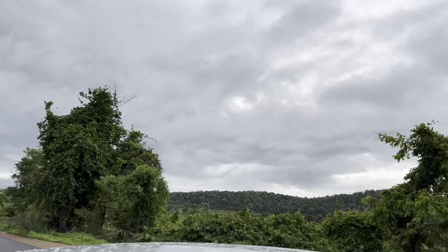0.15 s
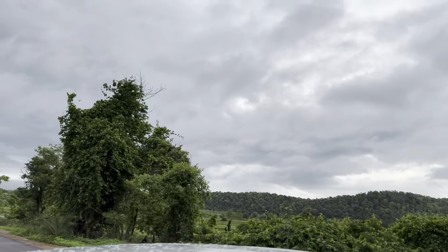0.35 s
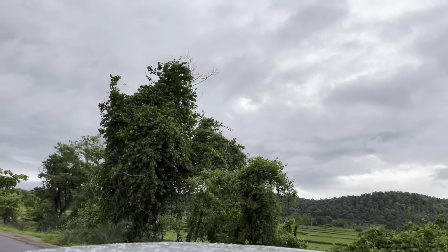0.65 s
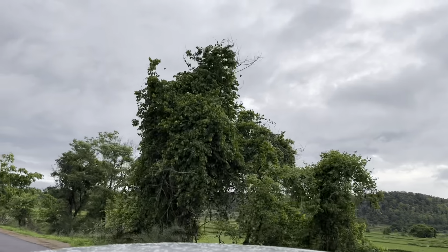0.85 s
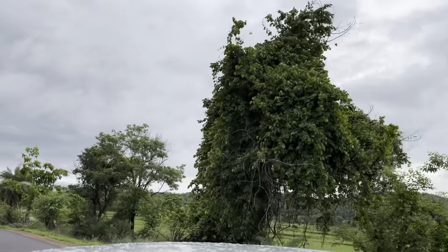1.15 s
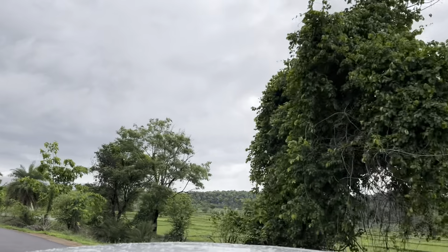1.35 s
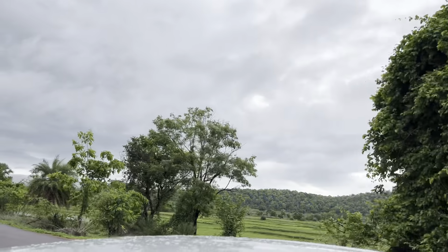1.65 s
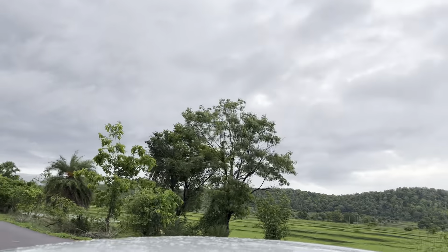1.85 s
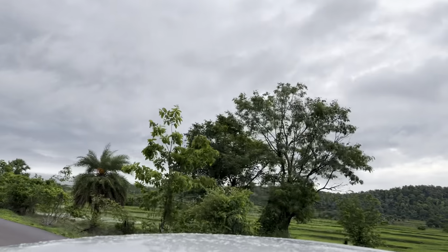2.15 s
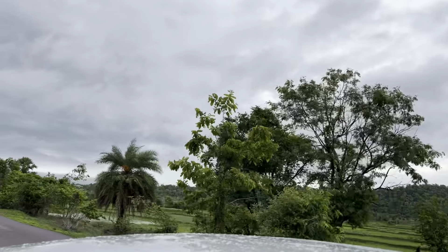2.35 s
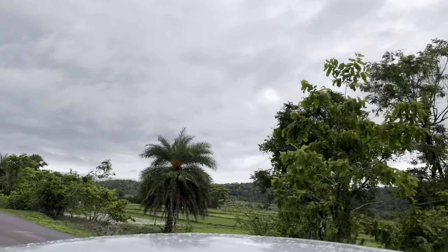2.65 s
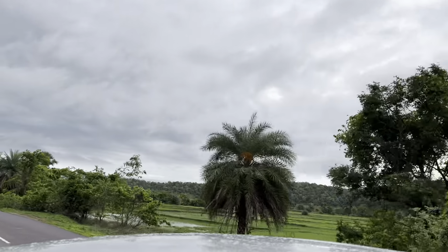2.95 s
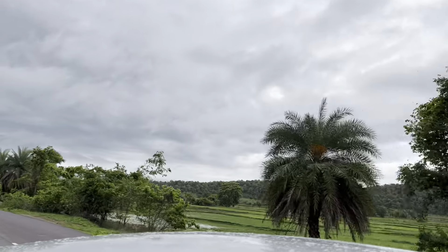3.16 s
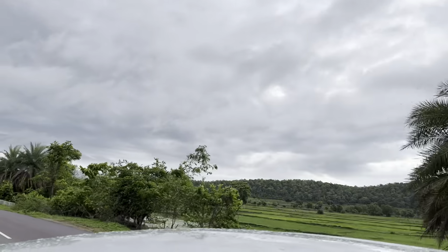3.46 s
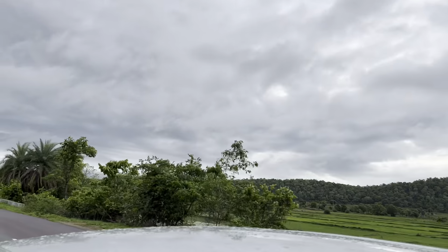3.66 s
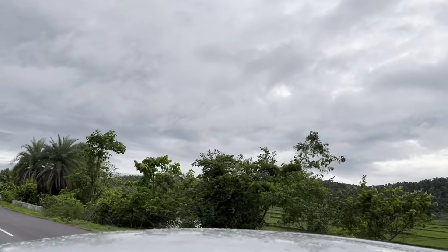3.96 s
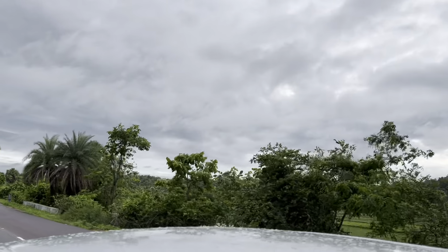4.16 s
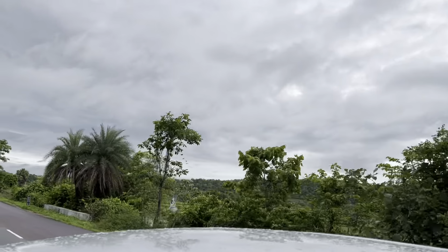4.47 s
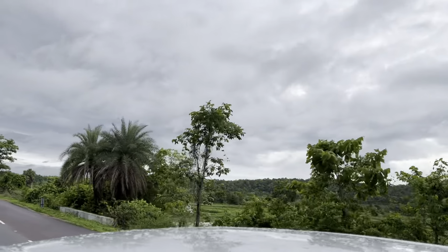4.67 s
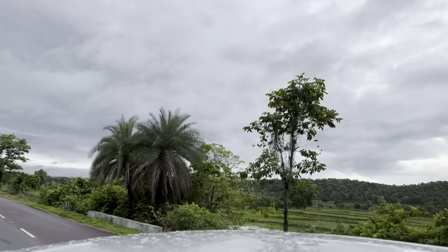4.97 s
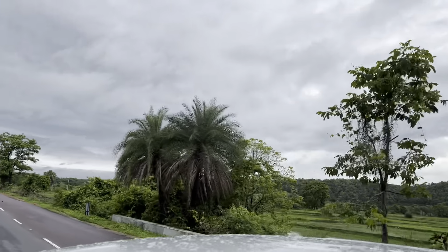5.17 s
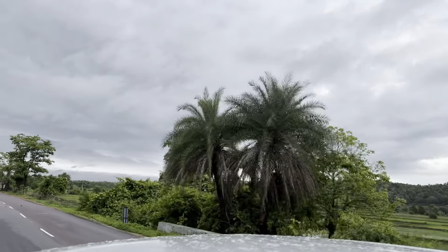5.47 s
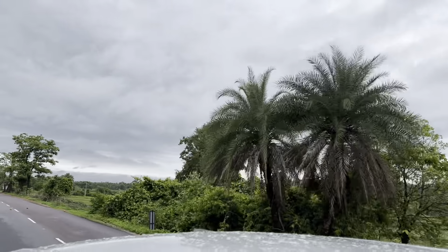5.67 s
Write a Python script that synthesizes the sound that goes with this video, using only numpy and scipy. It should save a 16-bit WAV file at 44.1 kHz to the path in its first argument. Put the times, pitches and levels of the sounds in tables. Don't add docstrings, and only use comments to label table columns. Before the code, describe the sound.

Wind buffets a phone held out of a moving car window: steady rushing hiss, low rumble, and irregular hard thumping pops and crackles.

```python
import sys
import numpy as np
from scipy import signal
from scipy.fft import rfft, irfft, next_fast_len
from scipy.io import wavfile
from scipy.ndimage import uniform_filter1d

SR = 44100
rng = np.random.default_rng(int(sys.argv[2]) if len(sys.argv) > 2 else 0)


def int16_out(signal):
    q = np.round(np.clip(np.atleast_2d(signal).T, -1, 1) * 32767)
    wavfile.write(sys.argv[1], SR, q.astype(np.int16))


def how_loud(loudness_db):
    steps = np.asarray(loudness_db, float) / 20
    return 10 ** steps


N = 256662
T_S = np.arange(N) / SR
SIZE = next_fast_len(N + SR // 4)
HZ = np.maximum(np.arange(SIZE // 2 + 1) * SR / SIZE, 1)

# (frequency [Hz], density [dB per Hz])
RUSH_SPECTRUM = [(150, -12.5), (400, -1.5), (700, 1), (1100, -2), (1650, -6), (1900, -15.5), (3000, -30),
                 (6000, -66.5), (15000, -109)]
# (time [s], pressure [dB], width [ms], push 1 or pull -1)
POP_EDDIES = [(0.0343, -11, 1.2, 1), (0.106, -4.5, 1.3, -1), (0.133, 6, 5.2, 1), (0.2655, -5.5, 2.6, 1),
              (0.3225, -4.5, 1.15, 1), (0.685, -12, 0.43, -1), (0.8184, -13, 1.3, -1),
              (1.1472, -3, 2.3, -1), (1.2593, 8.5, 0.68, 1), (1.2715, -5, 0.56, 1), (1.2844, 1.5, 3.1, -1),
              (1.426, -5.5, 0.92, -1), (1.6614, 7, 1.53, 1), (1.8024, 6.5, 1.1, 1), (2.269, 6, 7, -1),
              (2.307, 0, 4.1, 1), (2.362, -3, 3.4, 1), (3.5636, -3, 0.76, -1), (3.9147, -4, 2.3, -1),
              (4.28, -7, 0.92, 1), (4.848, -6.5, 1.4, -1), (4.8752, 6, 1.08, 1), (5.065, -5.5, 1.5, -1),
              (5.307, 0, 2, 1), (5.3643, -2, 0.88, 1), (5.4403, 0.5, 0.9, -1), (5.472, -2.5, 0.77, -1),
              (5.503, -3.5, 0.53, -1), (5.5377, -3.5, 1.6, -1), (5.7552, 1, 0.54, -1)]


def rms_one(x):
    return x / np.sqrt(np.mean(x ** 2) + 1e-20)


def at_hz(points, column=1):
    points = np.array(points)
    return np.interp(np.log(HZ), np.log(points[:, 0]), points[:, column])


def coloured(x, spectrum):
    return irfft(rfft(x, SIZE) * rms_one(how_loud(at_hz(spectrum))), SIZE)[..., :N]


def drift(rate_hz):
    hop = 40
    r = np.exp(-2 * np.pi * rate_hz * hop / SR)
    slow = signal.lfilter([1], [1, -2 * r, r * r], rng.standard_normal(N // hop + 2002))
    slow = slow[2000:]
    slow = slow - uniform_filter1d(slow, size=200)
    return np.interp(np.arange(N) / hop, np.arange(len(slow)), rms_one(slow))


def turbulence(spectrum, gust_db, patchy_db, rate_hz, channels=2):
    white = rfft(rng.standard_normal((channels, N)), SIZE) * how_loud(at_hz(spectrum))
    gust = gust_db * drift(rate_hz)
    out = 0
    for octave in np.arange(5, 15):
        band = np.cos(np.pi / 2 * np.clip(np.log2(HZ) - octave, -1, 1)) ** 2
        flicker = patchy_db * drift(rate_hz * 1.4)
        out = out + irfft(white * band, SIZE)[:, :N] * how_loud(gust + flicker)
    return rms_one(out)


def swells(rows):
    return sum(height * np.exp(-.5 * ((T_S - s) / length_s) ** 2) for s, height, length_s in rows)


def bumps(eddies):
    out = np.zeros((2, N))
    for s, level_db, width_ms, way, pan_db in eddies:
        near = slice(max(round((s - .02) * SR), 0), round((s + 0.036) * SR))
        lean = np.tanh(pan_db / 7) * np.array([[1], [-1]])
        bell = np.exp(-.5 * ((T_S[near] - s) / width_ms * 1000) ** 2)
        out[:, near] += way * how_loud(level_db) * (1 + lean) * bell
    return out


def airstream():
    # (time [s], speed as rush level [dB], broadside buffeting [dB])
    air = [(0.0, -28, -19.5), (0.41, -29, -31.5), (0.74, -27, -18.5), (0.92, -30, -25), (1.28, -29, -21.5),
           (1.46, -29, -27), (1.77, -28, -26.5), (2.06, -28, -26), (2.17, -30, -26.5), (2.66, -29.5, -27),
           (3.37, -31, -32), (3.71, -30.5, -28.5), (4.02, -28, -26.5), (4.28, -31.5, -27),
           (4.78, -30, -28.5), (5.07, -27, -23), (5.45, -28, -29), (5.82, -29, -20.5)]
    # (time [s], swell [dB], length [s], whistle [dB])
    gusts = [(0.036, -1, 0.029, -2.5), (.21, 0.5, 0.075, -1), (0.536, -1, 0.062, -1.5), (.7, 2.5, 0.057, 2),
             (0.805, -1.5, 0.048, -1.5), (0.967, 1.5, .03, 1.5), (1.289, 9, 0.045, 5.5),
             (1.81, 3, 0.05, 1.5), (2.309, 5, .05, 2.5), (2.606, 2, 0.074, 1), (3.163, 1.5, 0.026, 0),
             (3.3, -1, 0.075, 0.5), (3.9, 2.5, 0.059, 0), (4.042, 2, 0.04, -3), (4.284, 4.5, 0.016, 1),
             (4.452, 0, 0.083, 3), (4.65, -1.5, 0.069, 0), (5.103, -2, 0.04, 2), (5.3, 2, 0.065, 2),
             (5.492, 0, 0.036, 2), (5.64, 0.5, .04, 2), (5.815, 0.5, 0.025, 1.5)]
    s, speed_db, broadside_db = np.transpose(air)
    gust_db = swells([(s, db, length_s) for s, db, length_s, _ in gusts])
    whistle_db = swells([(s, db, length_s) for s, _, length_s, db in gusts])
    return np.interp(T_S, s, speed_db), np.interp(T_S, s, broadside_db), gust_db, whistle_db


def hiss(swing_db, whistle_db):
    # (frequency [Hz], density [dB per Hz])
    hiss_spectrum = [(900, -6), (1900, -4.5), (2500, -3), (3500, -6.5), (5000, -13), (6000, -15),
                     (6700, -17), (8000, -20), (9200, -25.5), (10800, -25), (12500, -30.5), (14500, -35.1),
                     (15500, -39)]
    # (frequency [Hz], likeness [0-1], right leads by [rad], left-right [dB])
    body = [(1900, .85, 0, 0), (2600, .4, -.6, 2), (3600, .15, -2.0, 4), (5100, .35, 0, 6),
            (6700, .6, 3.14, 1), (8000, .75, 5.4, -1), (9300, .95, 6.3, 0), (10400, .7, 7.3, 0),
            (11700, .65, 9.0, 0), (12700, .95, 9.4, 0), (13900, .5, 10.3, 0), (15100, .5, 12.5, 0)]
    mean_db, follows, fade_db_s = -38, 0.96, 0.93
    one, other = rfft(turbulence(hiss_spectrum, gust_db=1.03, patchy_db=1.43, rate_hz=100), SIZE)
    alike, lead_rad, tilt = at_hz(body), at_hz(body, column=2), how_loud(at_hz(body, column=3) / 2)
    right = alike * one * np.exp(1j * lead_rad) + np.sqrt(1 - alike ** 2) * other
    ports = irfft(np.array([one * tilt, right / tilt]), SIZE)[:, :N]
    return how_loud(mean_db + follows * swing_db + whistle_db - fade_db_s * T_S) * ports


def buffet(broadside_db, gust_db):
    # (frequency [Hz], density [dB per Hz])
    buffet_spectrum = [(20, -17), (45, 3.5), (90, -3.5), (150, -8.5), (250, -15.5), (600, -37), (1200, -49),
                       (6000, -110)]
    level = how_loud(broadside_db + 4 + 0.13 * gust_db)
    return level * turbulence(buffet_spectrum, gust_db=1.1, patchy_db=0.2, rate_hz=65, channels=1)


def flutter(swing_db, gust_db):
    # (frequency [Hz], density [dB per Hz])
    flutter_spectrum = [(60, -67.5), (130, -15.5), (220, 3.5), (330, 3), (520, -1), (900, -7),
                        (3000, -97.5)]
    shake_db, shake_s, shake_width_ms = -40, .012, 1
    shaken = swells([(s, how_loud(db + shake_db) * np.exp(-width_ms / shake_width_ms), shake_s)
                     for s, db, width_ms, _ in POP_EDDIES])
    level = how_loud(-31 + 0.23 * (swing_db + gust_db)) + shaken
    return level * turbulence(flutter_spectrum, gust_db=1.5, patchy_db=3.1, rate_hz=44, channels=1)


def rush(rush_db):
    return how_loud(rush_db) * turbulence(RUSH_SPECTRUM, gust_db=0.26, patchy_db=2.36, rate_hz=17)


def swarm(rush_db, per_s=110.0, width_ms=0.2):
    density = per_s * how_loud(rush_db - np.mean(rush_db))
    born = rng.random((2, N)) < density / SR
    sizes = how_loud(6.14 * np.minimum(rng.exponential(1, (2, N)), 3))
    sizes = sizes * rng.choice([-1, 1], (2, N))
    bump = np.exp(-.5 * (np.arange(-60, 61) / SR / width_ms * 1000) ** 2)
    return signal.fftconvolve(born * sizes * how_loud(rush_db + 2.25), bump[None], "same")


def crackles():
    # (time [s], rms [dB], dull part re bright [dB], length [ms])
    torn_eddies = [(0.032, -36, 24, 2.5), (1.371, -26, 7.5, 6.7), (0.0905, -32, 12, 6.9),
                   (0.125, -25, 7, 6.5), (0.2084, -27.5, 10, 16), (0.3165, -37, 12.5, 8.2),
                   (0.716, -20.5, -1.5, 15), (0.8191, -34, 11.5, 40), (0.983, -29, 8, 8.2),
                   (1.215, -26, -3, 2.9), (1.263, -14, 5, 8.1), (1.306, -17.5, 0, 8),
                   (1.3532, -21, -13, 6.7), (1.427, -25, -17, 6), (1.6106, -28.5, 9, 4.1),
                   (1.664, -14, 5.5, 5.6), (1.795, -25.5, 9.5, 15), (2.304, -20, 0, 8),
                   (2.355, -40, 4.5, 2.6), (2.631, -25.5, 2.8, 4.4), (3.908, -22.5, -11, 2.8),
                   (4.0596, -32, 7.5, 16), (4.2823, -34.5, 16, 13), (4.8809, -25, 8, 8.8),
                   (5.34, -32, -6, 3), (5.364, -25.5, 15, 4.3), (5.4463, -23, 10, 4.5),
                   (5.474, -29.5, 10, 6.5), (5.5055, -31.5, 15.5, 13), (5.756, -26, 10, 12)]
    # (frequency [Hz], density [dB per Hz])
    bright_spectrum = [(500, -14), (1300, 2.5), (2200, -0.2), (3500, -9.5), (6000, -26), (12000, -50),
                       (18000, -90.1)]
    windward_db = np.array([[2.25], [-2.25]])
    bright, dull = np.zeros((2, N)), np.zeros((2, N))
    for s, level_db, dull_db, length_ms in torn_eddies:
        near = slice(max(round((s - .05) * SR), 0), round((s + .05) * SR))
        late = (T_S[near] - s) * 1000 / (0.98 * length_ms)
        shape = np.exp(-(late * np.where(late < 0, 1.6, .9)) ** 2)
        burst = shape * how_loud(level_db + windward_db)
        bright[:, near] += burst
        dull[:, near] += burst * how_loud(dull_db)
    grains = rng.standard_normal((2, 2, N)) * how_loud(0.28 * drift(170) - 2)
    return coloured(bright * grains[0], bright_spectrum) + coloured(dull * grains[1], RUSH_SPECTRUM)


def ticks():
    # (time [s], pressure [dB], width [ms], left-right [dB])
    edge_eddies = [(0.0647, -11, 0.15, -1), (0.1098, -9, 0.42, -5), (0.2091, -8, 0.15, 2),
                   (0.2585, -7.5, 0.22, -8), (0.3375, -9.5, 0.34, 18), (1.2145, -9, 0.15, 17),
                   (1.2524, -4, 0.1, -8), (1.2587, 0, 0.21, -7), (1.3033, -11, 0.25, -3),
                   (1.3071, -0.5, 0.14, 0), (1.598, -8.5, 0.27, 1.5), (1.6616, 0.5, 0.49, -14),
                   (1.7935, -8, 0.18, -15), (1.7994, -0.5, 0.27, -1), (2.277, -9, 0.2, -16),
                   (2.2981, -8, 0.31, 0), (2.31, -4.5, 0.77, 0), (2.3552, -6, 0.28, -1),
                   (2.6319, -9, 0.49, 1), (3.072, -11.5, 0.17, 3), (1.669, -3.5, 0.4, -9),
                   (4.2774, -8, 0.28, 26), (4.852, -12, 0.16, 6), (4.8798, -2, 1, 14),
                   (5.3562, -8, 0.11, 13), (5.443, -3.5, 0.33, 13), (5.477, -7, 0.28, -8),
                   (5.508, -12, 0.14, -10), (5.536, -10.5, 0.14, 1), (5.763, -18, 0.17, 7)]
    return bumps([(s, db, width_ms, -1, pan_db) for s, db, width_ms, pan_db in edge_eddies])


def pops():
    return bumps([(*eddy, 0) for eddy in POP_EDDIES])


def scene():
    speed_db, broadside_db, gust_db, whistle_db = airstream()
    swing_db = speed_db - speed_db.mean()
    rush_db = speed_db + gust_db + 1
    stream = hiss(swing_db, whistle_db) + buffet(broadside_db, gust_db)
    stream = stream + flutter(swing_db, gust_db) + rush(rush_db)
    return stream + swarm(rush_db) + crackles() + ticks() + pops()


def phase_turn(hz, sharpness):
    w = 2 * np.pi * hz / SR
    a = np.sin(w) / 2 / sharpness
    return np.array([1 - a, -2 * np.cos(w), 1 + a, 1 + a, -2 * np.cos(w), 1 - a]) / (1 + a)


def wind_filter(dry):
    # (frequency [Hz], sharpness [Q])
    turns = [(87, 0.76), (507, 0.9)]
    cut = signal.butter(4, 60.7, "high", fs=SR, output="sos")
    left, right = signal.sosfilt(np.vstack([cut] + [phase_turn(*turn) for turn in turns]), dry)
    mono_below = signal.butter(5, 618, "high", fs=SR, output="sos")
    side = signal.sosfilt(mono_below, (left - right) / 2)
    return (left + right) / 2 + side * [[1], [-1]]


def limiter(x, ceiling_db=-.9, recover_db_s=113):
    over_db = np.maximum(20 * np.log10(np.abs(x).max(axis=0) + 1e-9) - ceiling_db, 0)
    ramp_db = recover_db_s * T_S
    held_db = np.maximum.accumulate(over_db + ramp_db) - ramp_db
    return x * how_loud(-uniform_filter1d(np.roll(held_db, -80), size=80))


def emptied(x, bands_hz):
    keep = np.prod([(HZ < low) | (HZ > high) for low, high in bands_hz], axis=0)
    return irfft(rfft(x, SIZE) * keep, SIZE)[:N]


def top_cut(x):
    return signal.sosfilt(signal.butter(12, 15700, fs=SR, output="sos"), x)


def record(dry):
    left, right = limiter(wind_filter(dry))
    mid = emptied((left + right) / 2, [(11650, 13800), (15300, 22050)])
    side = emptied((left - right) / 2, [(8300, 10350), (15150, 22050)])
    return top_cut(mid + side * [[1], [-1]])


dry = scene()
out = record(dry)
int16_out(out)
```